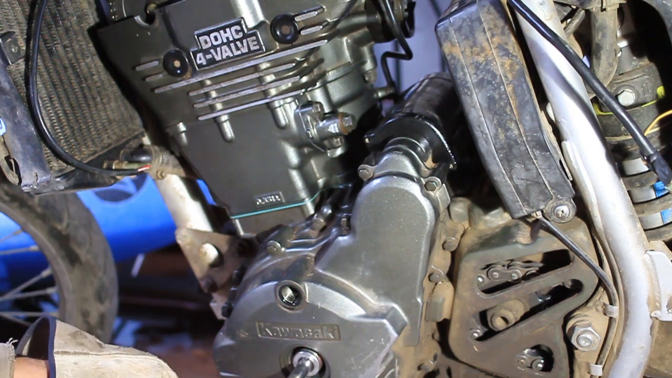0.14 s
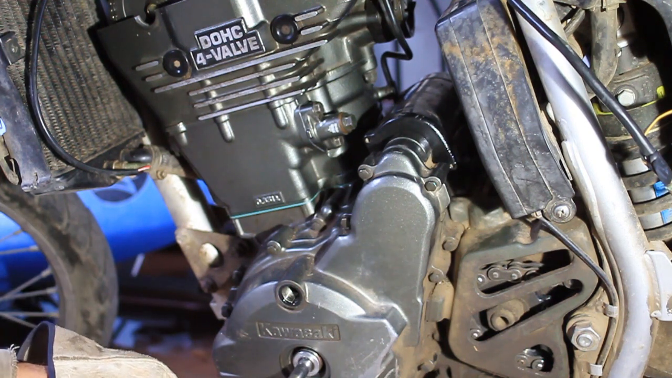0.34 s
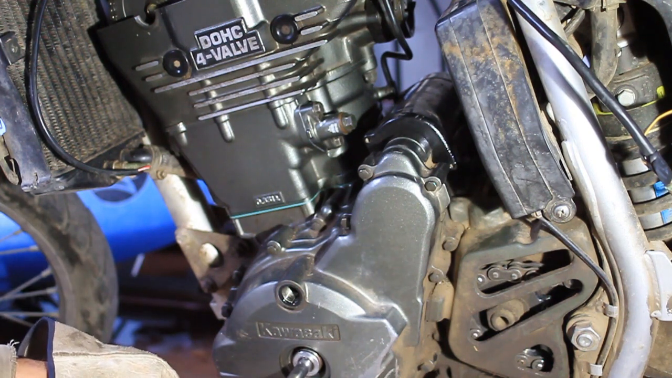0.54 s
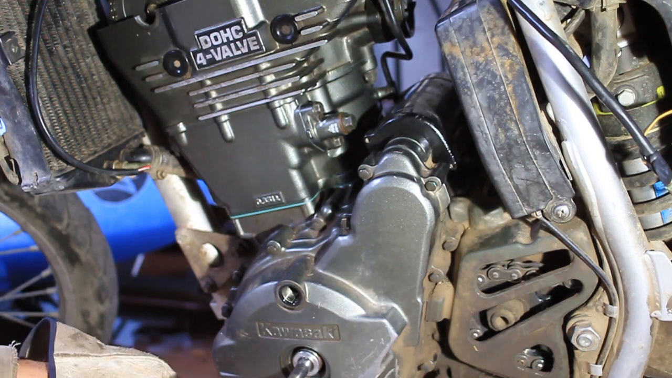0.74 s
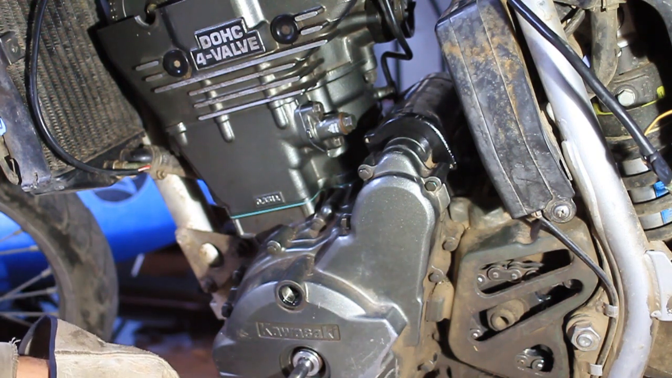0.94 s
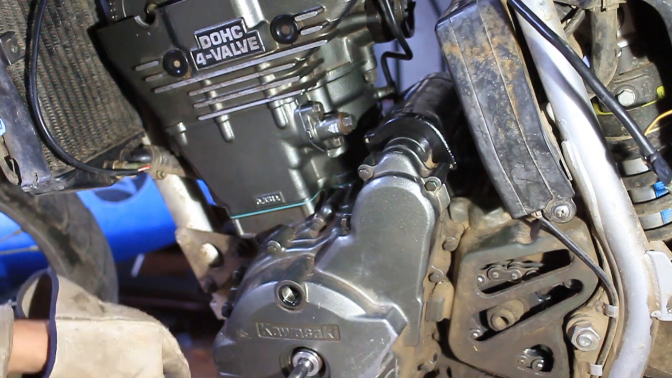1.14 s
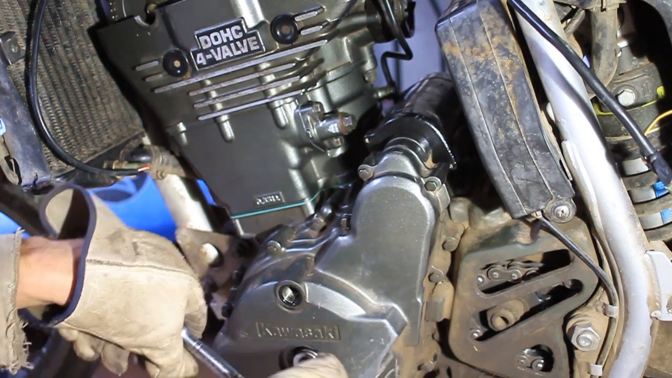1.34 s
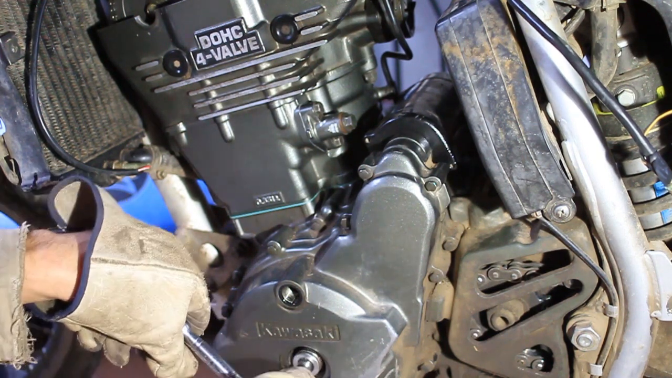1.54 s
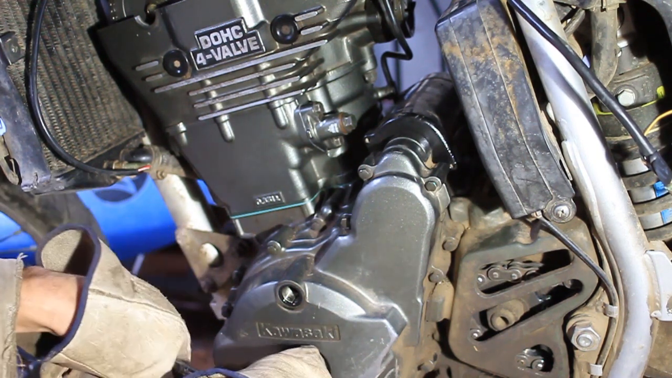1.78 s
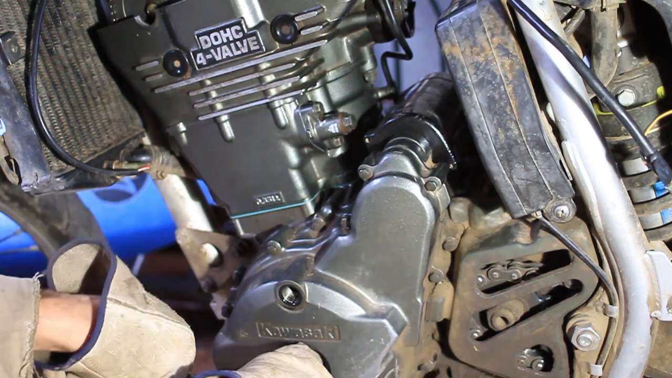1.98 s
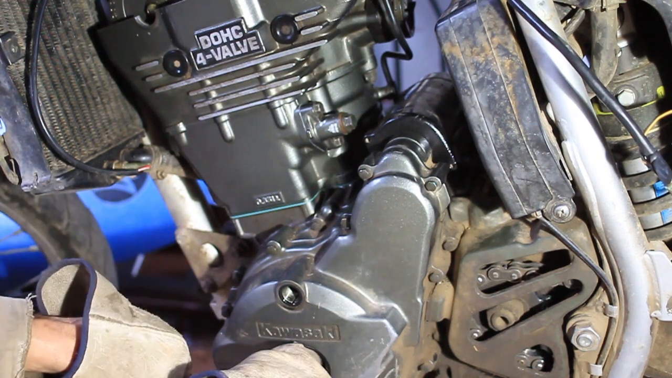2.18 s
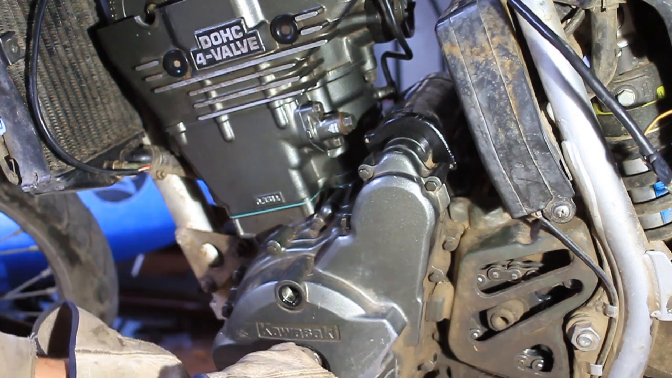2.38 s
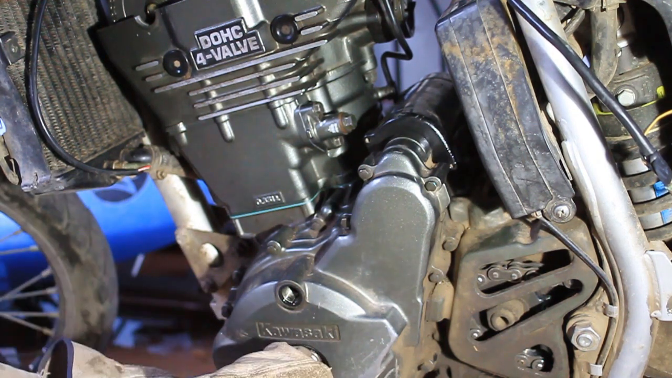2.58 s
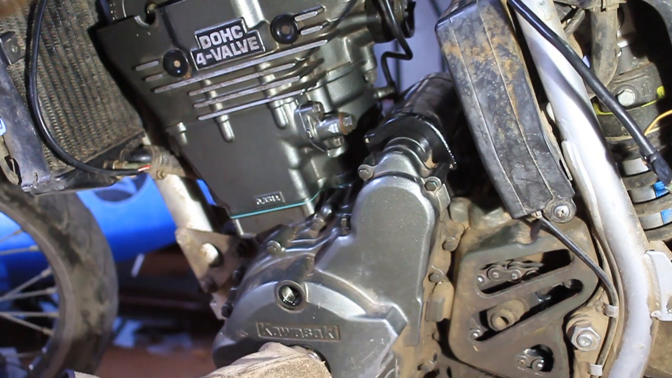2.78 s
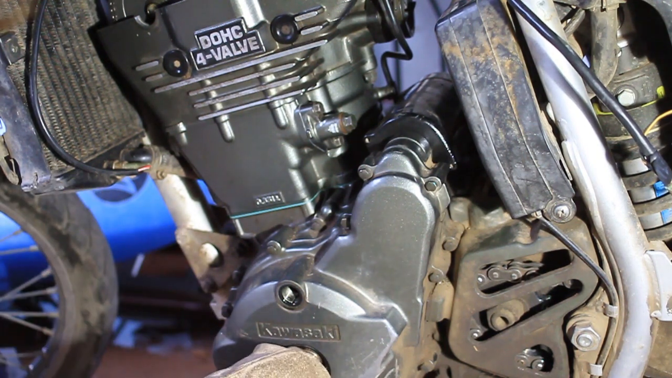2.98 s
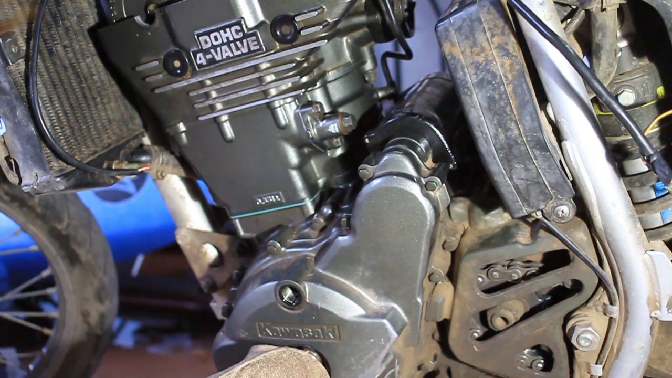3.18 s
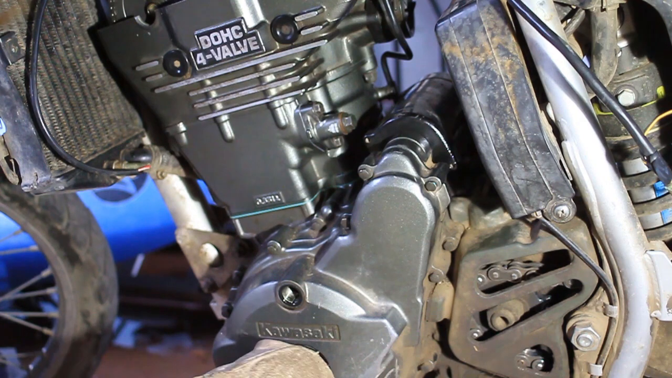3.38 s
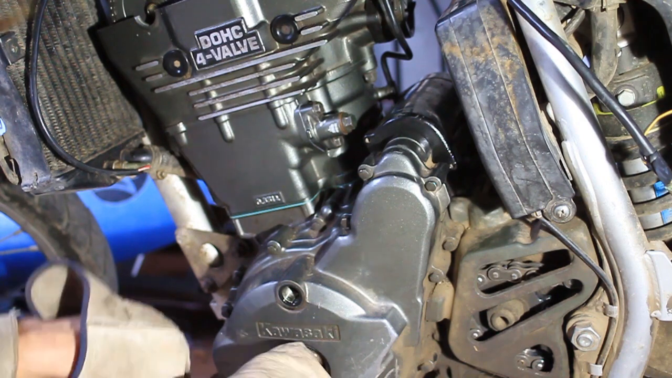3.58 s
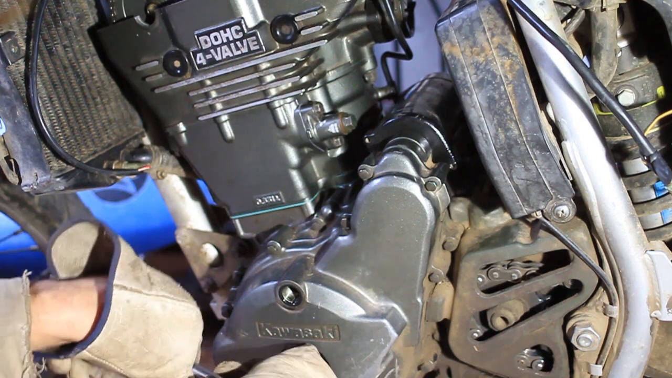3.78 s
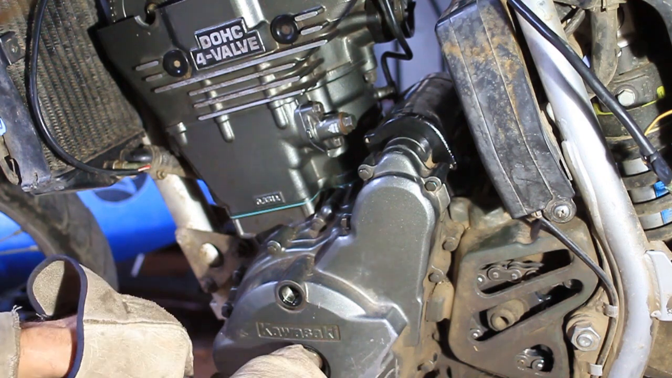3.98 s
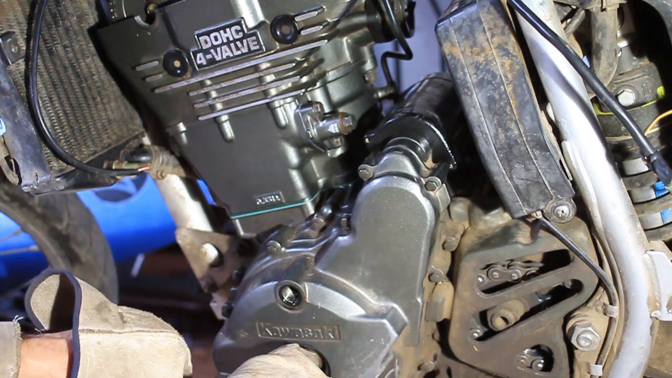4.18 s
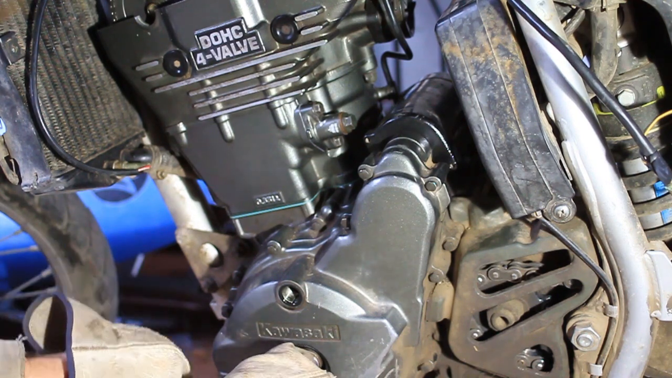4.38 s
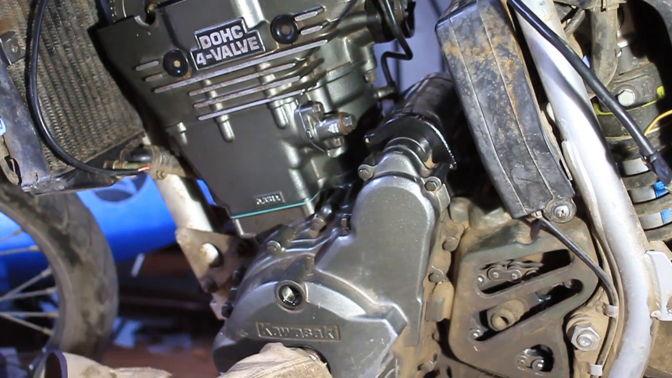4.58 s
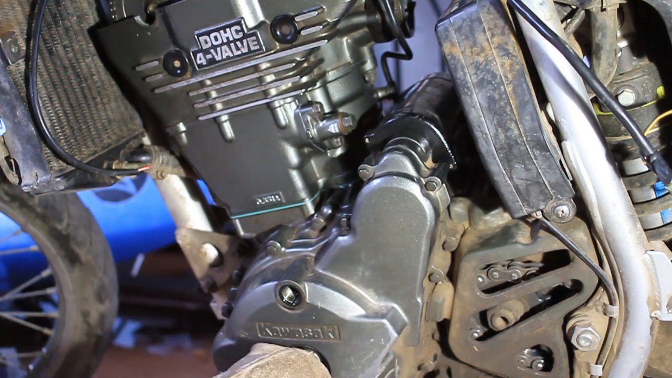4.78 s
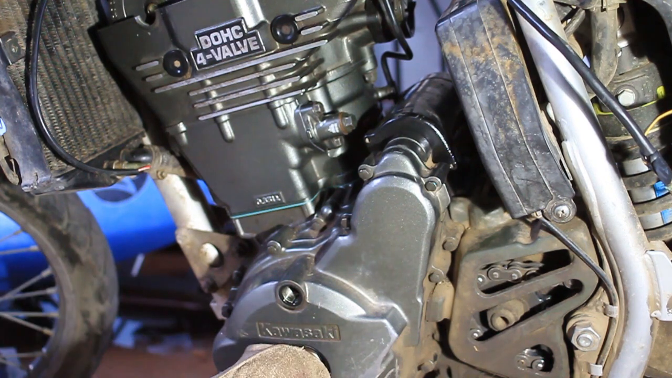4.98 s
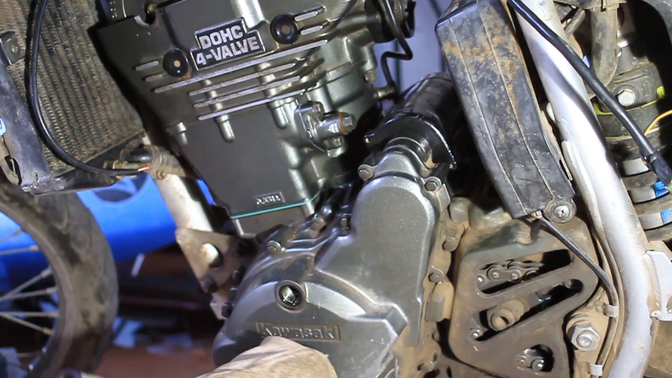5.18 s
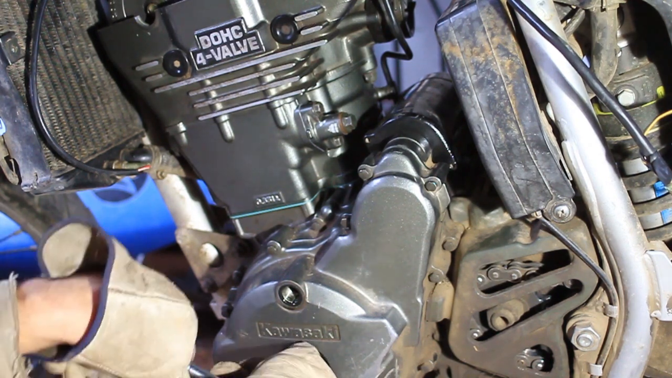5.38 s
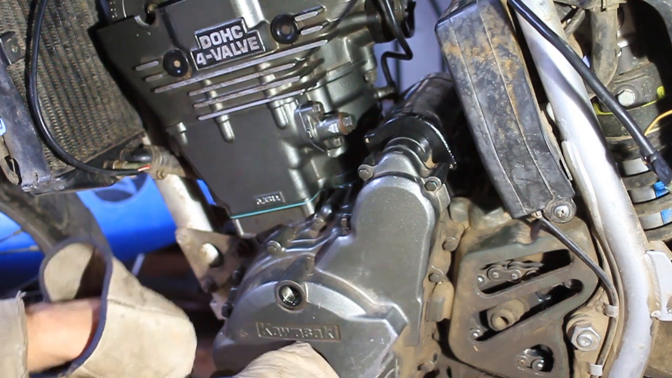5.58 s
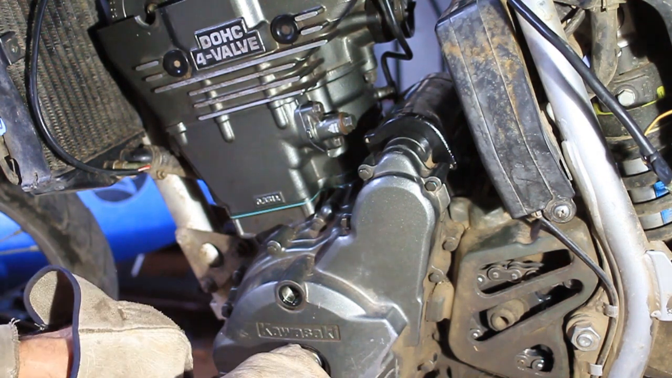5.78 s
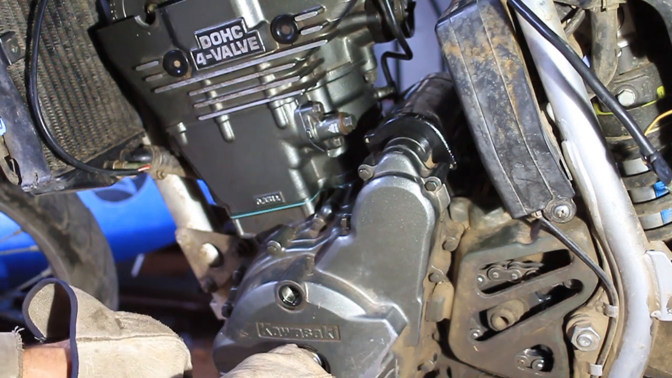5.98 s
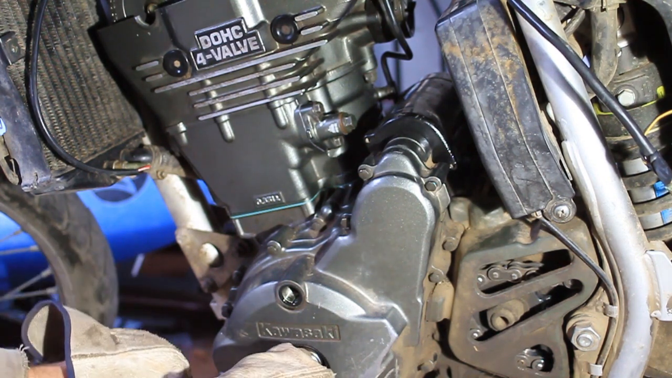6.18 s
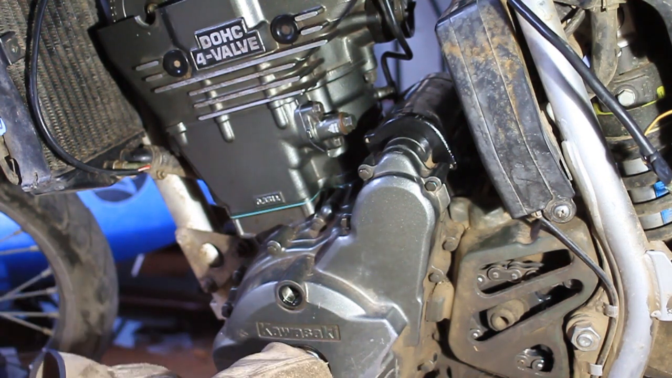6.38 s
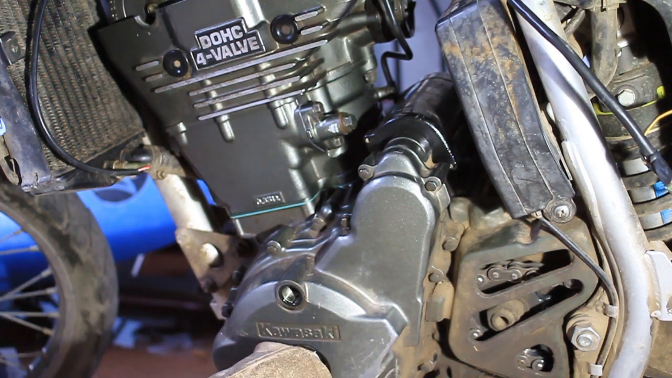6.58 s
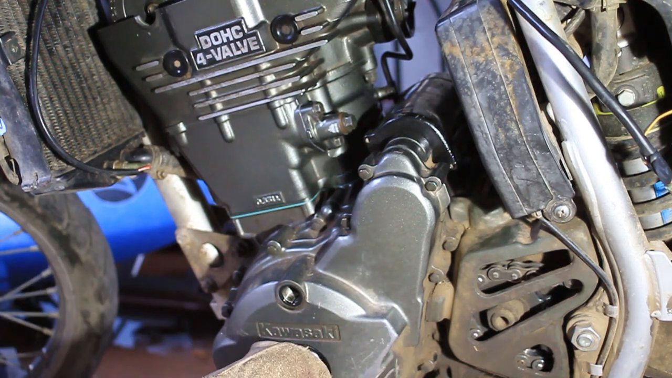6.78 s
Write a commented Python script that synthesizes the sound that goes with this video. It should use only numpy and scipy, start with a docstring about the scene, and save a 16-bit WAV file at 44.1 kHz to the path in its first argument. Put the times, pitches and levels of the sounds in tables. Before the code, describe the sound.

A socket ratchet clicks in three short bursts, each louder, with a sharp metal clank and soft engine rubbing in a workshop.

```python
"""A mechanic turns a motorcycle engine over by hand with a socket ratchet, in a softly rushing workshop.
A glove slides on the handle, then the socket clanks onto the crank nut. Three times the handle swings back,
its pawl (a small catch) clicking over the teeth, louder with each swing, and then drives the engine, which
rubs and knocks softly. Before the last drive stroke a low hum swells and the pawl snaps home under load.
After each loud hit, the close microphone's gain control briefly turns everything down."""
import sys
import numpy as np
from scipy import signal
from scipy.fft import rfft, irfft
from scipy.io import wavfile
from scipy.ndimage import uniform_filter1d, minimum_filter1d

SR = 44100
rng = np.random.default_rng(int(sys.argv[2]) if len(sys.argv) > 2 else 0)


def pcm_store(signal):
    """Save signal as 16-bit PCM."""
    levels = np.round(np.clip(np.atleast_2d(signal), -1, 1) * 32767)
    wavfile.write(sys.argv[1], SR, levels.astype(np.int16).T)


N = 301644
TIME = np.arange(N) / SR


def from_db(db):
    """Turn decibels into a factor to multiply a sound by."""
    return 10 ** (np.asarray(db) / 20)


def rms_one(x):
    """Scale a sound to an average (rms) size of 1."""
    return x / np.sqrt(np.mean(x ** 2) + 1e-20)


def add(out, s, sound):
    """Mix a sound in, starting at s seconds."""
    at = int(s * SR)
    out[at:at + len(sound)] += sound[:N - at]


def drift(rate_hz):
    """A random wander, roughly 1 either side of zero."""
    knots = rng.standard_normal(int(rate_hz * N / SR) + 2)
    return np.interp(TIME * rate_hz, np.arange(len(knots)), knots)


def coloured_noise(spectrum):
    """Noise of size 1, shaped by rows of (pitch [Hz], level [dB])."""
    hz, db = np.transpose(spectrum)
    bin_hz = np.maximum(np.arange(N // 2 + 1) * SR / N, 1)
    gain = from_db(np.interp(np.log(bin_hz), np.log(hz), db))
    return rms_one(irfft(rfft(rng.standard_normal(N)) * gain, N))


def resonate(pressure, modes):
    """Random pushes make an object ring at its modes (its own pitches); narrow modes ring longer."""
    out = 0
    for hz, width, db in modes:
        r = np.exp(-np.pi * width / SR)
        force = pressure * rng.standard_normal(len(pressure)) + 1e-18
        ring = signal.lfilter([1, 0, -1], [1, -2 * r * np.cos(2 * np.pi * hz / SR), r * r], force)
        out = out + from_db(db) * rms_one(ring)
    return rms_one(out)


def strike(modes, level_db, contact_s, bright_db=0, scatter_db=0):
    """A contact chatters briefly and leaves the modes ringing; bright_db is the rise over two octaves."""
    pressure = np.exp(-(TIME[:SR // 12] / contact_s) ** 2)
    tilted = [(hz, width, db + bright_db / 2 * np.log2(hz) + scatter_db * rng.standard_normal())
              for hz, width, db in modes]
    sound = resonate(pressure, tilted)
    # the level is that of the whole energy gathered into 4 ms
    return from_db(level_db) * sound / np.sqrt(np.sum(sound ** 2) / (.004 * SR))


def workshop_air():
    """An even background rush with a few droning tones and a swelling low hum."""
    # tone colour of the rush: (pitch [Hz], relative level [dB])
    rush_spectrum = [(20, -50), (35, -24), (55, -7.5), (120, -5.5), (230, -2.5), (380, -3.5), (600, -2),
                     (1000, -2.5), (1400, -5), (2200, -10), (4000, -18), (8500, -21.5), (12000, -22.5),
                     (15800, -33)]
    # droning tones: (pitch [Hz], width [Hz], relative level [dB])
    drone_modes = [(128, 4.2, -15), (463, 31, 2.5), (722.3, 34, 4), (1050, 176, 3.5)]
    # swell of the hum: (time [s], level [dB])
    hum_levels = [(0, -83.5), (5.3, -64), (5.8, -57), (6.84, -61)]
    steady = np.ones(N)
    hum = from_db(np.interp(TIME, *np.transpose(hum_levels))) * resonate(steady, [(176.7, 11, 0)])
    rush = from_db(-46) * coloured_noise(rush_spectrum)
    drone = from_db(-52.5) * resonate(steady, drone_modes)
    return rush + drone + hum


def workshop_echo(x, near_db, near_s, wall_db, wall_s, wall_spread_s, tail_db, low_t60, treble_t60):
    """Sound bounces off the bike, then the wall, then all around; a t60 is the seconds to fade 60 dB."""
    t = TIME[:SR * 3 // 4]
    near, wall, tail = rng.standard_normal((3, len(t)))
    near = near * np.exp(-t / near_s) * (t > .001)
    wall = wall * np.exp(-np.abs(t - wall_s) / wall_spread_s) * (t > wall_s)
    low = signal.sosfilt(signal.butter(2, 7000, fs=SR, output="sos"), tail)
    tail = low * from_db(-60 * t / low_t60) + (tail - low) * from_db(-60 * t / treble_t60)
    echoes = [(near_db, near), (wall_db, wall), (tail_db, tail)]
    response = sum(from_db(db) * echo / np.linalg.norm(echo) for db, echo in echoes)
    return x + signal.fftconvolve(x, response)[:N]


def squeaks():
    """Thin, wavering whistles that swell and fade."""
    # squeaks: (time [s], length [s], pitch [Hz], level [dB])
    whistles = [(4.327, 0.097, 7520, -57), (6.56, 0.075, 7400, -65)]
    out = np.zeros(N)
    for s, length_s, hz, db in whistles:
        add(out, s, from_db(db) * resonate(np.hanning(int(length_s * SR)), [(hz, 100, 0)]))
    return out


def glove():
    """Glove and sleeve slide on the handle; cloth and leather catch and slip in fine grains."""
    # slides: (time of peak [s], level [dB], swell and fade time [s])
    slides = [(.04, -46.5, 0.17), (.33, -47.5, 0.024), (.56, -55, 0.065), (.76, -49, 0.11),
              (1.05, -52, 0.17), (1.33, -45, 0.048), (1.68, -41, 0.082), (1.84, -48.5, 0.19),
              (2.1, -48.5, 0.066), (4.14, -52.5, 0.048)]
    # tone colour of the cloth: (pitch [Hz], relative level [dB])
    cloth_spectrum = [(500, -15), (1100, 0.5), (2600, 0), (4000, -0.5), (6300, -3.5), (7700, -3),
                      (8800, -6.5), (10200, -1.5), (12500, -6.5), (15500, -20)]
    shape = 1.5   # 1 = pointed peak, 2 = round bell
    swells = [from_db(db) * np.exp(-np.abs((TIME - s) / fade_s) ** shape) for s, db, fade_s in slides]
    grains = rms_one(coloured_noise(cloth_spectrum) * from_db(1.7 * drift(50) + 1.5 * drift(800)))
    return np.linalg.norm(swells, axis=0) * grains


def stroke_effort(start_s, end_s, db, attack_s=0.027, release_s=0.035, sag_db=4):
    """The rub sets in as the crank breaks free, eases in mid-stroke, builds again and stops."""
    progress = np.clip((TIME - start_s) / (end_s - start_s), 0, 1)
    attack = np.exp(np.minimum(TIME - start_s, 0) / attack_s)
    release = np.exp(np.minimum(end_s - TIME, 0) / release_s)
    return from_db(db - sag_db * np.sin(np.pi * progress)) * attack * release


def engine():
    """Parts knock softly inside the engine's case and give a grainy rub while the crank turns."""
    # knocks and ticks: (time [s], level [dB], brightness [dB], contact time [s])
    knocks = [(0.687, -39.5, 20, 0.0049), (0.7108, -39, -17, 0.0033), (0.743, -38, 3, 0.0053),
              (1.669, -28, 0, 0.0032), (1.703, -37, -21, 0.0048), (4.905, -43, -3, 0.0033),
              (4.978, -46, 40, .004), (5.656, -38.5, -17, 0.0025), (5.6757, -28.5, -13, 0.0088),
              (6.684, -39.5, 59, 0.0065)]
    # ring of the case: (pitch [Hz], width [Hz], relative level [dB])
    case_modes = [(700, 82, -11), (1050, 160, -2.5), (1450, 410, -6), (2030, 130, -3.5), (2580, 290, 0),
                  (3740, 240, 3), (4050, 280, 6), (4800, 1200, 8), (7500, 500, 3), (11500, 1500, -8),
                  (13800, 1200, -9)]
    # drive strokes that turn the crank: (start [s], end [s], rub level [dB])
    strokes = [(2.33, 3.17, -49.5), (4.406, 4.93, -44.5), (6.205, 7.1, -48)]
    # ring stirred by the rubbing: (pitch [Hz], width [Hz], relative level [dB])
    rub_modes = [(1300, 900, -2), (2750, 600, -.5), (3750, 550, 0), (5500, 1400, -3.5), (6550, 300, -12),
                 (7600, 250, -13), (9500, 300, -13), (10300, 250, -13.5), (11800, 2200, -5.5)]
    out = np.zeros(N)
    for s, level_db, bright_db, contact_s in knocks:
        add(out, s, strike(case_modes, level_db, contact_s, bright_db, scatter_db=2.0))
    friction = from_db(3.0 * drift(40) + 3.2 * drift(900))
    effort = sum(stroke_effort(*stroke) for stroke in strokes)
    return out + effort * resonate(friction, rub_modes)


def socket_ring(hz, t60):
    """The socket sings on with one pure, fading tone."""
    t = TIME[:SR // 2]
    return np.sin(2 * np.pi * hz * t) * np.exp(-np.log(1000) * t / t60)


def socket_clank(contact_s):
    """The socket skids over the corners of the nut and lands with a clank."""
    # hits on the nut: (time [s], level [dB], brightness [dB])
    hits = [(0.9788, -18.5, -13), (0.9810, -2, 0), (0.9822, -9, 6)]
    # ring of the bare socket: (pitch [Hz], width [Hz], relative level [dB])
    socket_modes = [(3050, 500, -17), (5800, 500, -17), (7300, 500, -10), (10900, 600, -7),
                    (4300, 250, -11), (4070, 90, 1), (9925, 100, 0), (11740, 200, -1.5), (15080, 120, -9)]
    # tones that linger: (pitch [Hz], level relative to the hit [dB], time to fade 60 dB [s])
    lingering = [(4030, -41, 0.25), (10000, -37, .25), (11800, -45, .25), (15080, -46, .22)]
    out = np.zeros(N)
    for s, level_db, bright_db in hits:
        add(out, s, strike(socket_modes, level_db, contact_s, bright_db))
        for hz, ring_db, t60 in lingering:
            add(out, s, from_db(level_db + ring_db) * socket_ring(hz, t60))
    return out


def pawl_snap():
    """The pawl drops fully into a tooth as the load comes on; the loaded socket rings higher."""
    # pawl snapping home: (time [s], level [dB])
    snaps = [(5.8357, -5.5)]
    # ring of the loaded ratchet head: (pitch [Hz], width [Hz], relative level [dB])
    head_modes = [(2730, 370, -14.5), (3400, 460, -17), (4630, 250, -17.5), (4990, 200, -9),
                  (6000, 610, -19), (7150, 330, -15), (8200, 350, -25), (9700, 240, -1.5),
                  (10100, 500, -5.5), (11550, 340, 0.5), (12600, 450, -4.5), (14000, 450, -11)]
    out = np.zeros(N)
    for s, level_db in snaps:
        add(out, s, strike(head_modes, level_db, contact_s=.0009))
        add(out, s, strike(head_modes, level_db - 3.0, contact_s=0.0057))   # the pawl judders
        add(out, s, from_db(level_db - 36) * socket_ring(hz=5060, t60=.24))
    return out


def pawl_clicks():
    """List the clicks: the grip firms up through a swing, and harder clicks are brighter."""
    # pawl falling off a tooth: (time [s], level [dB])
    tooth_drops = [(1.1304, -25), (1.1913, -39), (1.227, -39), (1.2894, -38), (1.3236, -26.5), (1.366, -24),
                   (1.4005, -24), (1.4377, -23.5), (1.544, -42), (3.506, -20), (3.53, -18), (3.5507, -24),
                   (3.5715, -21.5), (3.5922, -26), (3.6121, -24), (3.6356, -23), (3.6578, -24.5),
                   (3.681, -25.5), (3.7076, -32), (3.756, -35.5), (5.237, -19), (5.2622, -18),
                   (5.2828, -11.5), (5.3007, -10.5), (5.3187, -14), (5.3379, -7), (5.3564, -10),
                   (5.3763, -7), (5.3982, -10.5), (5.4243, -7.5), (5.4626, -9.5)]
    # return swings: (start [s], end [s], first grip [0 loose to 1 firm], last grip, brightness [dB])
    swings = [(1.1, 1.6, .04, 0.056, -9), (3.48, 3.78, 0.39, 0.58, -5.5), (5.21, 5.49, 0.77, 0.96, -0.5)]
    rows = []
    for start_s, end_s, first_grip, last_grip, bright_db in swings:
        clicks = [(s, db) for s, db in tooth_drops if start_s <= s < end_s]
        mean_db = np.mean([db for s, db in clicks])
        for s, db in clicks:
            grip = np.interp(s, [start_s, end_s], [first_grip, last_grip])
            brighter_per_db = np.interp(grip, [0, 1], [1.75, 0.43])
            rows.append((s, db, grip, bright_db + brighter_per_db * (db - mean_db)))
    return rows


def ratchet(contact_s, rebound_s, rebound_db, scatter_db, socket_db):
    """The pawl hits each tooth and bounces; a firmer grip damps the socket and shifts the ring upwards."""
    # ring of ratchet and socket: (pitch [Hz], width [Hz])
    wrench_modes = [(1850, 300), (2480, 380), (3250, 300), (4070, 70), (4420, 180), (5330, 340),
                    (6250, 300), (6950, 180), (7560, 150), (8300, 400), (9920, 170), (10170, 260),
                    (11740, 260), (12000, 280), (14300, 450), (15170, 240)]
    # rows for a loose, medium and firm grip: (relative level [dB] of each mode above)
    grip_levels = [(-29, -25, -14, 1, -32, -25, -15, -17, -10, -19, -0.5, 0, -5.5, -18, -15, -21),
                   (-19, -25.5, -26, -9.5, -13.5, -17.5, -10.5, -17, -10.5, -7, -2, 1.5, 1, 1.5, -16, -5),
                   (-27.5, -10, -40, -28, -26, -9, -12.5, -15, -5.5, -18, -7.5, -8, 0.5, -4, -27, -22)]
    out = np.zeros(N)
    for s, level_db, grip, bright_db in pawl_clicks():
        modes = [(hz, width, np.interp(grip, [0, .5, 1], by_grip))
                 for (hz, width), by_grip in zip(wrench_modes, np.transpose(grip_levels))]
        add(out, s, strike(modes, level_db, contact_s, bright_db, scatter_db))
        bounce_s = s + rebound_s * rng.uniform(.7, 1.3)
        add(out, bounce_s, strike(modes, level_db + rebound_db, contact_s, bright_db, scatter_db))
        looseness = 1 - np.clip(grip, 0, 1)
        add(out, s, from_db(level_db + socket_db) * looseness ** 2 * socket_ring(hz=4085, t60=0.24))
    return out


def scene():
    """Tool and engine echo in the workshop; glove, squeaks and background join them in one channel."""
    clicks = ratchet(contact_s=0.0012, rebound_s=.0014, rebound_db=-9.5, scatter_db=2.5, socket_db=-30)
    close = clicks + socket_clank(contact_s=0.00081) + pawl_snap() + engine()
    room = workshop_echo(close, near_db=-9, near_s=0.0033, wall_db=-17.5, wall_s=.0235,
                         wall_spread_s=0.0073, tail_db=-13, low_t60=0.54, treble_t60=0.36)
    return (room + glove() + squeaks() + workshop_air())[None]


def gain_control(x, threshold_db, attack_s, hold_s, release_db_per_s):
    """The volume drops quickly when the sound passes a threshold, holds, then creeps back."""
    power = uniform_filter1d(x[0] ** 2, SR // 500)
    level_db = 10 * np.log10(np.maximum(power, 1e-12))
    over_db = np.maximum(level_db - threshold_db, 0)
    hold = int(hold_s * SR) | 1
    held_db = -minimum_filter1d(-over_db, hold, origin=hold // 2)
    cut_db = np.maximum.accumulate(held_db + release_db_per_s * TIME) - release_db_per_s * TIME
    cut_db = np.interp(TIME + 0.00052, TIME, cut_db)   # the detector runs slightly ahead
    r = np.exp(-1 / (attack_s * SR))
    return x * from_db(-signal.lfilter([1 - r], [1, -r], cut_db))


def record(dry):
    """Turn loud hits down, clip peaks beyond full scale, and cut the treble above 16 kHz."""
    levelled = gain_control(dry, threshold_db=-11.0, attack_s=0.0025, hold_s=0.021, release_db_per_s=51.0)
    treble_cut = signal.ellip(10, .1, 70, 16000, fs=SR, output="sos")
    return signal.sosfilt(treble_cut, np.clip(levelled, -1, 1))


dry = scene()
out = record(dry)
pcm_store(out)
```